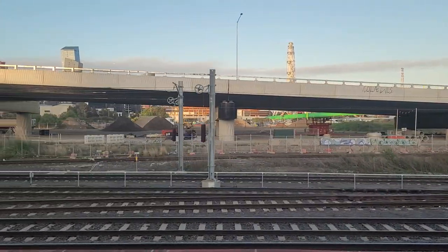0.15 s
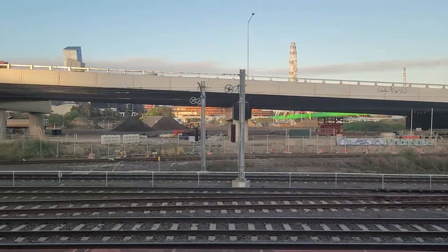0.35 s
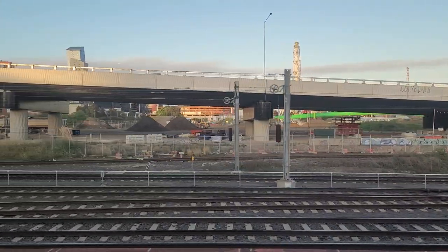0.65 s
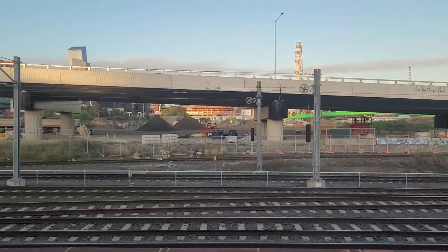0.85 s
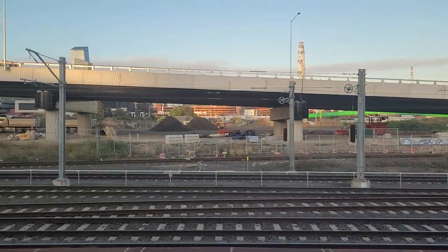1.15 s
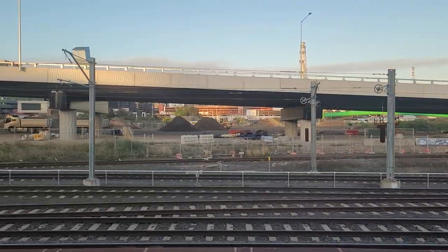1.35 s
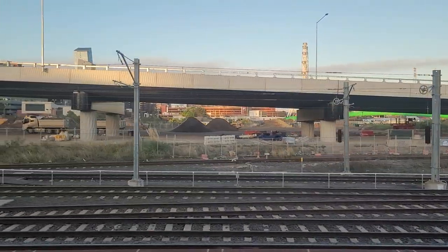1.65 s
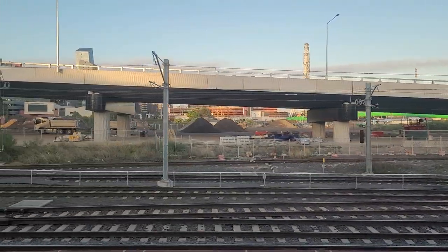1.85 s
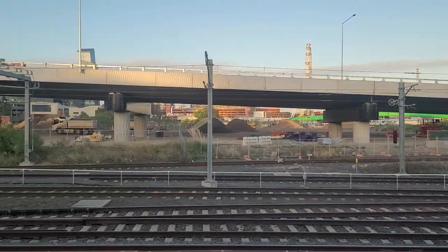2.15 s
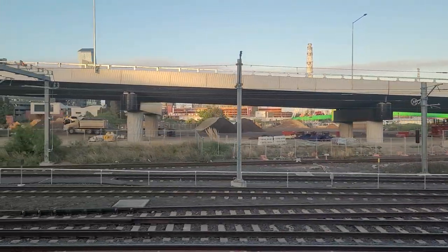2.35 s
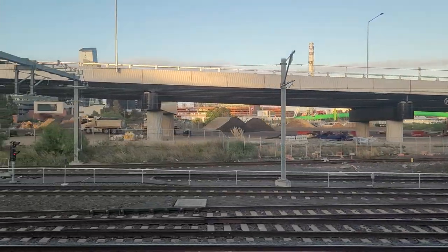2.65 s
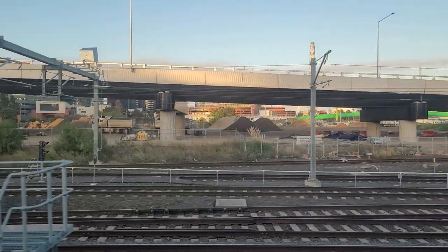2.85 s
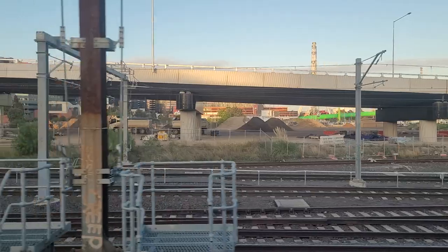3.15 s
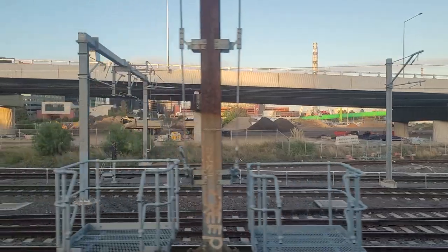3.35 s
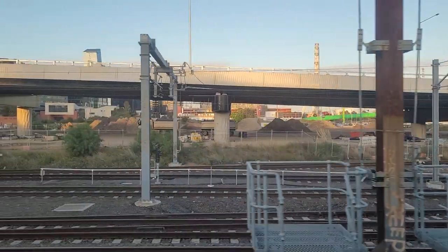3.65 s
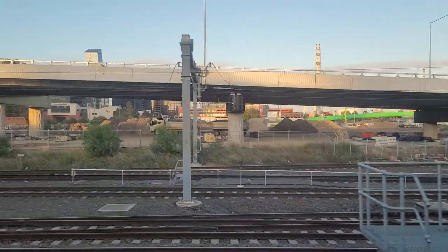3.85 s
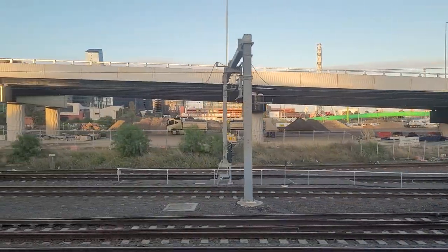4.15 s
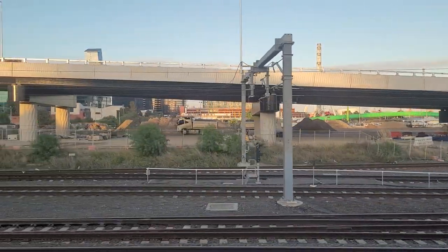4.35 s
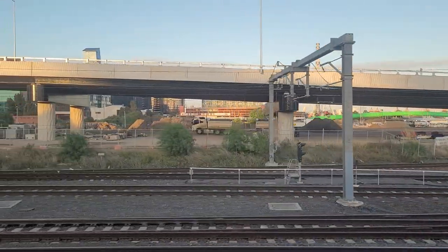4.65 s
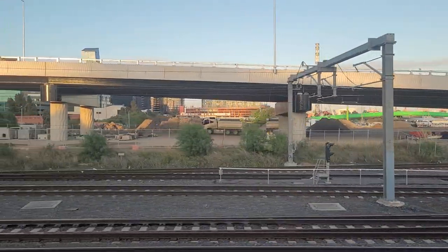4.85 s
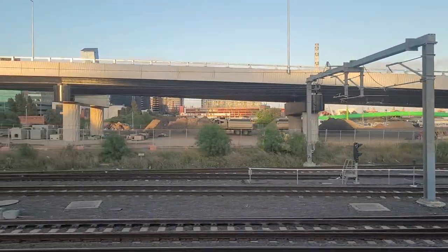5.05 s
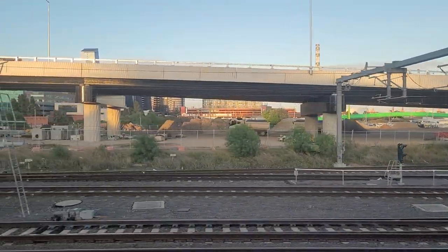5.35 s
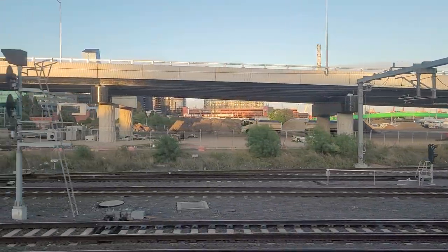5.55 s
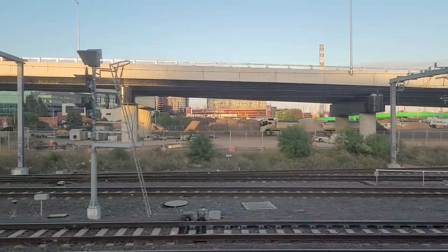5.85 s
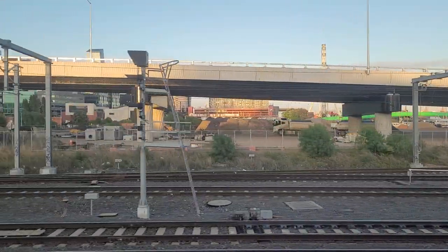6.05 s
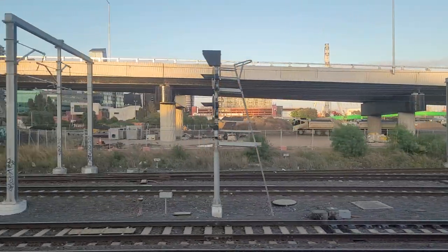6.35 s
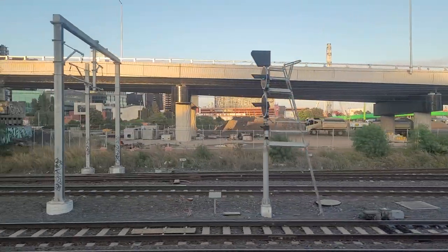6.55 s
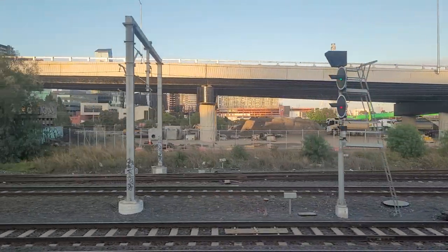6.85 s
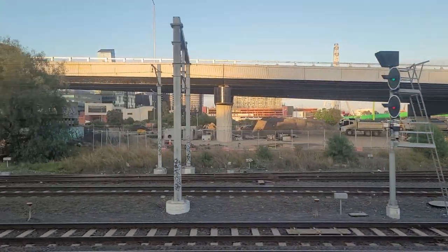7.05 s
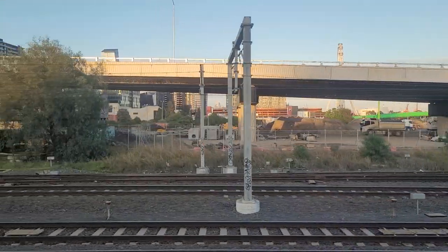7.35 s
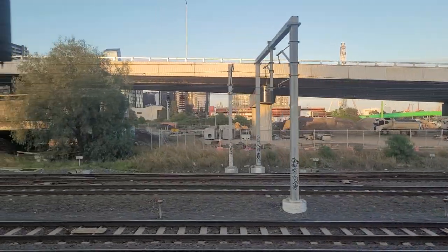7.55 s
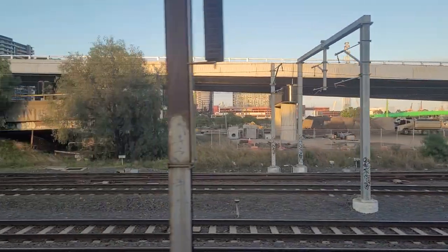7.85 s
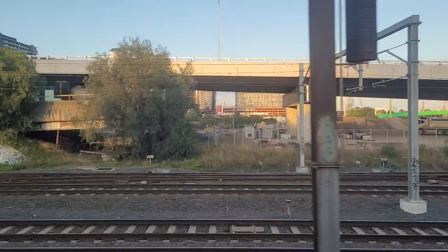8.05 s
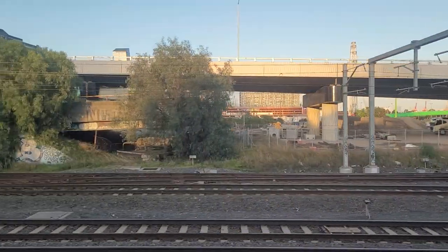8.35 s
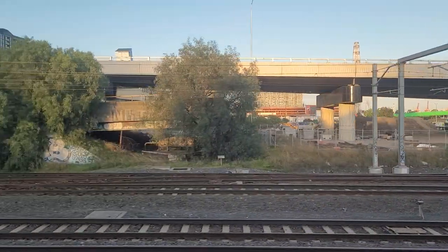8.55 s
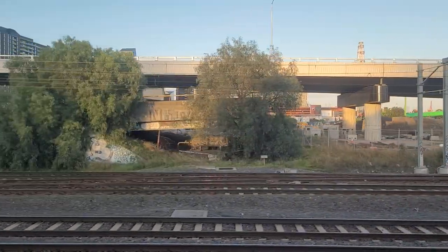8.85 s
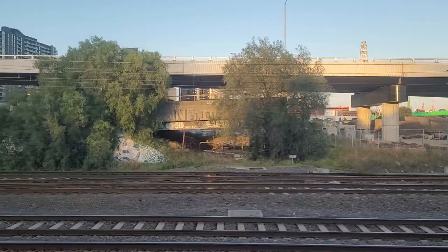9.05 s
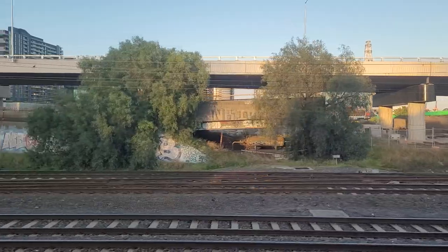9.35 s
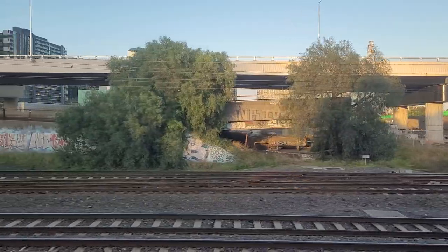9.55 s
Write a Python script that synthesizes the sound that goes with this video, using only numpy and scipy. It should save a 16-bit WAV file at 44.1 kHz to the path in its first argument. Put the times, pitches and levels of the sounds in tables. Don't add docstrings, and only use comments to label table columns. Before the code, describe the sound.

Close stereo sound within a moving electric railcar: heavy low vibration, uneven and bumpy, dominates a soft outside rail roar and airy hiss. Muffled thuds strike before one second, near two and near seven, while interior trim clicks faintly. Rough track makes the panels boom most around eight seconds. Just past nine, a loose fitting snaps hard with a short rattling tail and brief reverberation.

```python
import sys
import numpy as np
from scipy import signal
from scipy.fft import rfft, irfft, next_fast_len
from scipy.io import wavfile
from scipy.ndimage import uniform_filter1d, map_coordinates

SR = 44100
rng = np.random.default_rng(int(sys.argv[2]) if len(sys.argv) > 2 else 0)


def generate_wav(signal):
    frames = np.transpose(np.atleast_2d(signal))
    scaled = np.clip(frames, -1, 1) * 32767
    pcm = np.round(scaled).astype(np.int16)
    wavfile.write(sys.argv[1], SR, pcm)


def gain_from_db(level_db):
    decades = np.asarray(level_db, float) / 20
    return 10 ** decades


N = 427769

# (centre [Hz], width [Hz], level [dB])
SPRINGS = [(26, 9.6, -7), (43, 16, -2.5)]
FRAME = [(50.5, 14, -6), (62, 13.6, 2), (84, 21, -6)]
FLOOR = [(101.4, 22.8, 0.5), (131, 26, -1)]
PANELS = [(168.9, 31.5, 0.69), (220, 48, -4.5), (252.8, 31, -0.5), (280.7, 17.2, -1.5)]
WINDOW = [(305.8, 30.8, -0.5), (347.3, 41, -1), (409.3, 39.3, -4), (440, 19.2, -3), (533, 120, -12.5),
          (605.4, 57, -12.5), (696, 16, -16.5), (720, 17, -17)]
FITTING = [(2000, 70, -0.5), (2350, 150, 3), (2780, 700, 1.5), (3450, 540, -0.5), (4540, 600, -1.5),
           (6100, 600, -6), (6950, 500, -7.5), (7800, 500, -9.5), (10100, 600, -11), (11400, 600, -16),
           (12400, 500, -15)]
# (time [s], level [dB])
TRACK = [(0, -31.5), (.5, -29), (.8, -26.5), (1.05, -30), (1.7, -26.5), (2.6, -30), (3.3, -29.5),
         (4.1, -30.5), (5.3, -29.5), (6.3, -28.5), (6.8, -28), (7.1, -23), (7.6, -21), (8.1, -18.5),
         (8.6, -23), (8.95, -21), (9.25, -27.5), (9.7, -27)]
SMOOTH_DB = -30
# (centre [Hz], level on smooth track [dB], gain per roughness [dB/dB])
SHAKE = [
    (35, -43, 0.2),
    (63.3, -40.5, 1.22),
    (115, -35.5, 0.96),
    (170, -38.5, 0.6758),
    (257, -39.5, 0.9863),
    (350, -39.5, 1.0),
]
# (time [s], length [s], gain [dB], pitch [Hz])
RISES_AND_FALLS = [(0.164, 0.11, 4, 130.4), (0.821, 0.035, 5.5, 60.3), (0.777, 0.036, 8.5, 330),
                   (1.314, 0.057, 5, 70.3), (1.32, 0.062, 2, 221), (1.619, 0.033, 3, 61), (1.673, 0.026, 8.5, 129),
                   (1.718, 0.057, 9, 62), (1.981, 0.039, 13, 147), (3.196, 0.057, 9.5, 160), (3.284, 0.057, 3, 159),
                   (3.537, 0.073, 14, 76), (3.662, 0.03, 9, 60.3), (3.828, 0.041, 8, 104), (5.6, 0.021, 4.5, 115),
                   (5.83, 0.034, -1, 278), (5.96, 0.062, 4, 115), (8.432, 0.09, 5, 420), (6.477, 0.11, 4, 62.2),
                   (6.943, 0.035, 7, 250), (7.186, 0.054, 11, 68.8), (7.252, 0.08, 6.5, 298), (7.469, 0.023, 4, 115),
                   (7.655, 0.11, 8.5, 247), (8.033, 0.083, 8, 225), (8.443, 0.07, 9.5, 170), (8.519, 0.031, 7.5, 115),
                   (8.847, 0.19, 7.5, 214), (8.985, 0.032, 3.5, 70.2), (9.167, 0.055, 12, 218),
                   (2.573, 0.16, 7.5, 336), (2.2, 0.061, -1, 373), (2.808, 0.083, 4.5, 107), (3.013, 0.065, -5, 115),
                   (2.09, 0.061, -0.5, 170), (4.45, 0.039, 6.5, 170), (4.566, 0.055, -5.5, 240), (4.908, 0.3, 6, 295),
                   (6.374, 0.081, -8.5, 120), (6.935, 0.02, 4.5, 125), (7.989, 0.035, 6.5, 170),
                   (8.868, .07, 2.5, 84.6), (8.321, .06, -3, 65), (8.701, 0.074, 3.5, 170), (5.83, .08, 0.5, 62),
                   (6.14, 0.072, 0, 65), (4.313, .06, 4.5, 115), (7.199, 0.066, -4, 137), (8.625, 0.043, -3, 370),
                   (3.47, 0.057, 5.5, 138),
                   (0.61, .04, -4, 63), (.75, 0.028, -4.5, 115), (0.72, .025, -6.5, 85), (7.18, 0.023, -1, 63),
          (.6, .1, -5.5, 70), (7.1, 0.069, -4.5, 180), (6.5, .06, -5, 310), (1.8, .1, -2, 280),
          (5.8, 0.087, -7, 250), (3.15, .1, 3.5, 72), (2.35, .06, 8, 50), (11, 0.11, 5.5, 200),
          (4.55, .06, -4, 55), (6.0, .1, -2, 84), (1.25, .1, 3, 270), (2.5, .08, -0.5, 115),
          (2.6, .1, -3, 450), (3.1, .1, 0, 55), (3.6, .07, -6, 60), (4.1, 0.13, 0, 61), (4.35, .12, 3, 370),
          (4.77, 0.11, -6.5, 198), (5.5, .15, -3, 62), (7.02, 0.067, -2, 170), (7.87, 0.091, -0.5, 190),
          (7.96, .06, -1, 150), (8.169, .08, 1, 384), (9.02, 0.089, 7, 76), (8.9, .1, 3.5, 152),
          (9.48, .12, 0, 88), (3.1, 0.12, 3.5, 440), (.35, .1, -4.5, 231)]
# (time [s], gain [dB])
LURCHES_AND_LULLS = [(.8, 5), (1.65, 5.5), (2.13, 5.5), (2.77, 7.5), (4.38, 4.5), (5.2, 4.5), (6.3, 0.5), (7.97, 3),
                     (8.95, -0.5), (2.5, -2.5), (3.15, -3), (3.62, 3), (4.6, 0.5), (5.7, 6.5), (6.02, -2.5),
                     (7.03, -4.5), (8.45, -1.5), (8.8, -7), (9.5, 0.5)]
# (time [s], peak level [dB], pitch [Hz], t60 [s])
THUDS = [(0.755, -15.5, 350, 0.055), (.778, -23.5, 407, 0.092), (0.792, -20, 291, 0.09),
         (0.831, -21, 260, .1), (1.658, -21.5, 112, 0.22), (1.955, -16.5, 145, 0.078),
         (3.52, -25, 131, 0.13), (3.81, -26.5, 108, 0.21), (6.907, -16.5, 350, 0.1),
         (6.913, -20.5, 130.7, 0.14), (6.929, -16, 135, 0.097), (6.924, -14.5, 440, 0.078),
         (6.926, -17, 300.5, 0.15), (6.945, -21, 442, 0.075), (6.955, -24.5, 303, .1),
         (6.904, -32, 894, 0.13), (6.925, -33, 720, .09), (6.948, -31, 712, 0.039), (.835, -21.5, 288, .07),
         (.76, -34.5, 746, 0.05), (.762, -31, 590, 0.094), (.78, -37, 823, 0.066), (9.12, -21, 209.2, 0.55)]
# (time [s], edge level [dB], ring level [dB], brightest [Hz])
SNAPS = [(2.322, -45, -41.5, 8000), (2.329, -56.5, -56, 7500), (2.335, -54.5, -54, 7500),
         (2.344, -59, -60, 8000), (4.7001, -53, -47, 7000), (9.0567, -32, -35.5, 15000),
         (9.0601, -47.5, -46, 12000), (9.068, -41.5, -46, 14000), (9.077, -46, -51, 14500),
         (9.0803, -47, -52, 14500), (9.087, -48, -54, 12000), (9.097, -47.5, -54, 9000),
         (9.105, -54, -58, 11000), (9.116, -50, -56, 8500), (9.128, -50, -55, 13000),
         (9.132, -47, -55, 13000)]
# (time [s], peak level [dB], left over right [dB], brightest [Hz])
TICKS = [(0.194, -59.5, 0.5, 15000), (0.6315, -51, 5, 7360), (0.691, -56.5, -1, 9500),
         (0.7294, -62, -3, 8000), (1.3389, -62, -4, 8000), (1.4202, -56, -3, 8000),
         (1.6664, -60.5, 4, 8000), (1.833, -54, 4, 12000), (2.175, -54, 1, 7800), (3.2235, -61, 0, 9000),
         (3.5478, -52.5, 5, 8000), (3.8165, -56, 3, 8000), (6.9065, -54.5, 1, 11400),
         (7.3124, -52, 0, 7500), (7.385, -55, 3, 7500), (7.431, -59.5, 7, 7500), (7.515, -60, 7, 7500),
         (7.8232, -55, 3.5, 10500), (7.8454, -64.5, -6, 10100), (7.888, -66, 3, 5200),
         (7.9497, -52, -0.5, 10000), (8.7864, -52.5, 8, 8200), (8.8488, -54.5, 6, 8000)]
# (time [s], peak level [dB], pitch [Hz], t60 [s])
PINGS = [(7.8232, -60, 6700, .016), (7.9503, -43, 5370, 0.024), (7.9505, -46, 7750, 0.035),
         (7.9505, -50, 6500, .02), (7.951, -53, 6300, .016), (7.3, -51, 4880, 0.026),
         (7.385, -57, 6400, .015), (2.4, -53, 2300, .015)]
# (time [s], level [dB])
RAILS = [(0, -45.5), (.55, -46), (.75, -43), (.9, -45), (1.4, -43), (1.55, -44), (2, -43), (3.2, -44),
         (4.6, -44), (6.6, -44), (6.92, -43), (7.08, -43.5), (7.3, -42.5), (8.3, -43.5), (8.83, -43),
         (9, -46), (9.7, -46.5)]
# (time [s], length [s], rms level [dB], low edge [Hz], high edge [Hz])
LEAKS = [(.3, .15, -94, 8000, 10200), (.63, 0.11, -78, 2500, 8050), (1.405, 0.12, -68.5, 3600, 6400),
         (1.412, 0.15, -73, 2800, 8100), (1.421, .1, -90, 8000, 9800), (1.796, 0.4, -71.5, 4800, 7950),
         (1.8, .26, -88, 11800, 15700), (1.81, 0.34, -83, 8000, 11800), (1.95, 0.56, -87, 5000, 10300),
         (2.12, .14, -91, 9000, 12500), (2.6, 0.6, -84, 9300, 11550), (2.3, .5, -91, 8000, 10300),
         (2.512, 0.72, -76.5, 4000, 8150), (3.12, .36, -89, 7000, 10300), (5.078, 0.65, -90.5, 7050, 11800),
         (6.902, 0.072, -72, 2000, 8200), (7.168, 0.063, -90, 7000, 10100), (7.963, 0.069, -72, 4520, 8200),
         (8.502, 0.35, -94, 7330, 8500), (8.696, 0.13, -77, 4000, 8140), (9.38, 0.15, -82.5, 7450, 7900)]
# (pitch [Hz], level [dB], unsteadiness [Hz])
HUM = [(65, -45.5, 1.5), (248.7, -46.5, 2.526), (436.4, -49.5, 2.2), (3030, -73, 3.3)]
# (frequency [Hz], level [dB])
ROAR = [(250, -39), (420, -7), (458, -3.5), (486, -2.5), (571, -11.5), (600, -5.5), (655, -6.5),
        (705, -6.5), (986, -18.5), (1220, -16), (2400, -35), (3120, -66), (5280, -120)]
HISS = [(1000, -24), (1700, -3), (2070, -7.5), (2490, -8), (3140, -11), (3610, -13.5), (4420, -15.5),
        (5220, -20), (7400, -25.5), (9000, -43), (11700, -71.5), (19800, -120)]
SNAP_COLOUR = [(1250, -32), (1900, 0.5), (2700, -8.5), (3750, -7.5), (4450, -9.5), (5400, -9), (7900, -11),
               (8600, -22.5), (11500, -21.5), (13500, -36), (15700, -41.5)]
SELF_NOISE = [(5000, -13), (8500, -4.5), (10100, -1), (10500, -5), (13000, -5), (15000, -2), (15700, -3.5)]
# (frequency [Hz], t60 [s])
CABIN = [(1000, 0.38), (4000, 0.61), (12000, 0.28)]
# (frequency [Hz], likeness [1])
ALIKE = [(40, .985), (170, .96), (300, .8), (430, .68), (600, .38), (780, .1), (950, -.3), (1300, -.12),
         (1550, -.3), (2200, -.05), (8000, 0)]
# (frequency [Hz], left over right [dB])
TILT = [(50, -0.8), (210, -1), (430, -3.5), (850, 0.5), (1250, -4), (1700, -2), (2100, 0.5), (3800, 2.5),
        (5200, 0), (9000, -2), (15000, 1.5)]
# (frequency [Hz], left leads by [rad])
LEAD = [(40, .4), (85, .3), (150, .2), (260, .04), (700, 0), (950, -.5), (1550, .5), (1800, 1), (15000, 1)]
LEFT_NEARER = gain_from_db(np.array([[1.5], [-1.5]]))


def rolling():
    def lining(f):
        return f ** 4 / (f ** 4 + 19 ** 4) / (1 + (f / 900) ** 4)

    def steep(table):
        return lambda f: np.abs(modes(table)(f)) ** 1.27 * lining(f)

    parts = (SPRINGS, FRAME, FLOOR, PANELS[:1], PANELS[1:], WINDOW)
    out = np.zeros((2, N))
    for level_db, part in zip(shaking(), parts):
        noise = field(rng.standard_normal((2, N)), steep(part))
        shaken = steadied(noise, span_s=0.083, share=0.7)
        out += gain_from_db(level_db + 1.1 * wobble(9) + 1.21 * wobble(5)) * shaken
    return out


def shaking():
    rough_db = roughness()
    levels = []
    for centre, db, grows in SHAKE:
        near = lambda hz: np.exp(-(np.log2(hz / centre) / 0.43) ** 2)
        jolts = [(s, length, gain_db * near(hz)) for s, length, gain_db, hz in RISES_AND_FALLS]
        levels.append(db + grows * rough_db + swells(jolts))
    levels[0] = levels[0] + swells([(s, 0.22, db) for s, db in LURCHES_AND_LULLS])
    return levels


def roughness():
    return curves(TRACK)[0] - SMOOTH_DB


def steadied(pair, span_s, share):
    span = int(span_s * SR)
    power = uniform_filter1d(uniform_filter1d(np.mean(pair, axis=0) ** 2, span), span)
    return pair / (np.abs(power) + 0.012) ** (np.clip(share, 0, 1) / 2)


def thuds():
    out, t = np.zeros(N + SR), np.arange(SR // 2) / SR
    f = np.fft.rfftfreq(len(t), 1 / SR)
    for s, db, hz, t60 in THUDS:
        noise = rfft(rng.standard_normal(len(t)))
        puff = unit(irfft(noise * modes([(hz, 1.2 * hz, 0)])(f) ** 2, len(t)))
        ring = 1.08 * np.sin(2 * np.pi * hz * t) + 0.45 * puff
        envelope = gain_from_db(db - 60 * t / t60) * (1 - np.exp(-t / 0.006))
        out[round(s * SR):][:len(t)] += envelope * ring
    return filtered(out[:N], lambda f: 1 / (1 + (f / 1000) ** 6))


def crack():
    pulses, blows, splinters = np.zeros((3, N))
    t, lead = np.arange(SR // 50) / SR, SR // 1000
    impulse = np.pad(1. * (t == 0), lead)
    for s, edge_db, ring_db, top_hz in SNAPS:
        start = round(s * SR)
        at = slice(start - lead, start + len(t) + lead)
        edge = dulled(impulse, top_hz)
        grit = gain_from_db(edge_db + 6.5 - 60 * t / 0.022) * rng.standard_normal(len(t))
        pulses[at] += gain_from_db(edge_db + 23.5) * edge
        splinters[at] += dulled(np.pad(grit, lead), top_hz)
        blows[at] += gain_from_db(ring_db + 30.5) * edge
    ring = filtered(blows, lambda f: modes(FITTING)(f) ** 2)
    direct, pulses = filtered(np.array([.08 * pulses + splinters, pulses]), colour(SNAP_COLOUR))
    return (direct + ring) * LEFT_NEARER + gain_from_db(3.5) * cabin(pulses + 0.17 * ring)


def ticks():
    out, rings = np.zeros((2, N + SR)), np.zeros(N + SR)
    t, lead = np.arange(SR // 50) / SR, SR // 1000
    for s, db, pan_db, top_hz in TICKS:
        edge = rng.standard_normal(len(t)) * gain_from_db(3.5 - 60 * t / 0.031) + 1.5 * (t == 0)
        gains = gain_from_db(db + np.array([[pan_db / 2], [-pan_db / 2]]))
        tick = dulled(np.pad(edge, lead), top_hz) * gains
        out[:, round(s * SR) - lead:][:, :tick.shape[1]] += tick
    for s, db, hz, t60 in PINGS:
        envelope = gain_from_db(db - 60 * t / t60) * (1 - np.exp(-t / 0.00082))
        rings[round(s * SR):][:len(t)] += envelope * np.sin(2 * np.pi * hz * t)

    def plastic(f):
        bass_cut = f ** 4 / (f ** 4 + 2000 ** 4)
        return bass_cut * (5500 / (f + 500)) ** 0.99 * (0.33 + 1 / (1 + (f / 8300) ** 30))

    out, rings = filtered(out[:, :N], plastic), rings[:N]
    return out + rings * LEFT_NEARER + gain_from_db(-5.5) * cabin(out.mean(axis=0) + .3 * rings)


def dulled(burst, top_hz):
    f = np.fft.rfftfreq(len(burst), 1 / SR)
    loss = (1 + 1j * f / (1.6 * top_hz)) * np.sqrt(1 + (f / top_hz) ** 20)
    return irfft(rfft(burst) / loss, len(burst))


def cabin(x):
    hz, t, z = signal.stft(rng.standard_normal((2, SR // 2)), SR, nperseg=256)
    decay = gain_from_db(-60 * t / along(CABIN, hz)[:, None])
    tail = signal.istft(z * decay, SR, nperseg=256)[1]
    delayed = np.pad(x, (300, 0))[None]
    return signal.fftconvolve(delayed, tail / np.linalg.norm(tail[0]), axes=1)[:, :N]


def air():
    rails_db, = curves(RAILS)
    roar_gain = gain_from_db(rails_db + 0.62 * wobble(11))
    roar = roar_gain * field(patchy(depth_db=0.5), colour(ROAR))
    vent_db = -63 + (rails_db - rails_db.mean()) + 3.5
    hiss_gain = gain_from_db(vent_db + 0.76 * wobble(13))
    return roar + hiss_gain * field(patchy(depth_db=0.0), colour(HISS))


def patchy(depth_db):
    z = signal.stft(rng.standard_normal((2, N)), nperseg=512)[2]
    patches = uniform_filter1d(rng.standard_normal(z.shape[1:]), size=5, axis=0)
    patches = uniform_filter1d(patches, size=12, axis=1)
    return signal.istft(z * gain_from_db(depth_db * unit(patches)), nperseg=512)[1][:, :N]


def leaks():
    out, size = np.zeros((2, N + SR)), SR - SR // 4
    hz, t = np.fft.rfftfreq(size, 1 / SR), np.arange(size) / SR
    for s, length, db, low_hz, high_hz in LEAKS:
        band = 1 / (1 + (low_hz / (hz + 1)) ** 7) / (1 + (hz / high_hz) ** 60)
        noise = unit(irfft(rfft(rng.standard_normal((2, size))) * band, size))
        swell = np.sin(np.pi * np.clip(t / length, 0, 1) ** 0.63) ** 1.5
        puffs = gain_from_db(1.5 * np.interp(t, np.arange(40) / 45, rng.standard_normal(40)))
        out[:, round(s * SR):][:, :size] += gain_from_db(db + 7.0) * np.abs(swell * puffs) * noise
    return out[:, :N]


def hum():
    out = np.zeros(N)
    for hz, db, drift in HUM:
        phase = 2 * np.pi * np.cumsum(hz + drift * wobble(6)) / SR
        out += gain_from_db(db - 1.5 + 2.2 * wobble(1.9)) * np.sin(phase)
    return out


def field(pair, response):
    def mid_side(hz):
        turn = np.arccos(np.clip(along(ALIKE, hz), -1, 1)) / 2
        return response(hz) * np.array([np.ones_like(hz), np.tan(turn)])

    mid, side = filtered(pair, mid_side)
    return np.array([mid + side, mid - side]) / np.std(mid)


def modes(table):
    def response(f):
        total = 0
        for k, (c, w, db) in enumerate(table):
            total = total + (-1) ** k * gain_from_db(db) * 1j * f * w / (c * c - f * f + 1j * f * w)
        return total
    return response


def colour(table):
    return lambda f: gain_from_db(along(table, f)) * (f >= table[0][0]) * (f <= table[-1][0])


def filtered(x, response):
    m, edge = next_fast_len(N + SR // 2), SR // 5
    wide = np.pad(x, [(0, 0)] * (x.ndim - 1) + [(edge, m - N - edge)], "reflect")
    return irfft(rfft(wide) * response(np.fft.rfftfreq(m, 1 / SR)), m)[..., edge:edge + N]


def swells(rows):
    grid_s = np.arange(0, N / SR + .01, .002)
    rise_db = sum(db * np.exp(-((grid_s - s) / length) ** 2) for s, length, db in rows)
    return np.interp(np.arange(N) / SR, grid_s, rise_db)


def wobble(rate):
    grid_s = np.arange(0, N / SR + .01, .001)
    curve = map_coordinates(rng.standard_normal(400), [grid_s * min(rate, 40)])
    return np.interp(np.arange(N) / SR, grid_s, curve)


def curves(rows):
    s, *cols = np.transpose(rows)
    return [np.interp(np.arange(N) / SR, s, c) for c in cols]


def along(points, hz):
    f, v = np.transpose(points)
    return np.interp(np.log(hz + 1), np.log(f + 1), v)


def unit(x):
    return x / np.sqrt(np.mean(x ** 2) + 1e-20)


def scene():
    return rolling() + air() + leaks() + hum() + thuds() + ticks() + crack()


def low_pass(x):
    return signal.sosfilt(signal.butter(12, 16560, fs=SR, output="sos"), x)


def record(dry):
    def ports_response(hz):
        half = gain_from_db(along(TILT, hz) / 2) * np.exp(.5j * along(LEAD, hz))
        return np.array([half, 1 / half]) * (hz < 15720)

    noise = unit(filtered(rng.standard_normal((2, N)), colour(SELF_NOISE)))
    capsule = gain_from_db(-83.0 - 0.15 * roughness()) * noise
    ports = filtered(dry + capsule, ports_response)
    n = np.arange(N)
    ends = np.clip(np.minimum(n + 40, N + 60 - n) / 300, 0, 1)
    return low_pass(ports * np.sin(np.pi / 2 * ends))


dry = scene()
out = record(dry)
generate_wav(out)
```